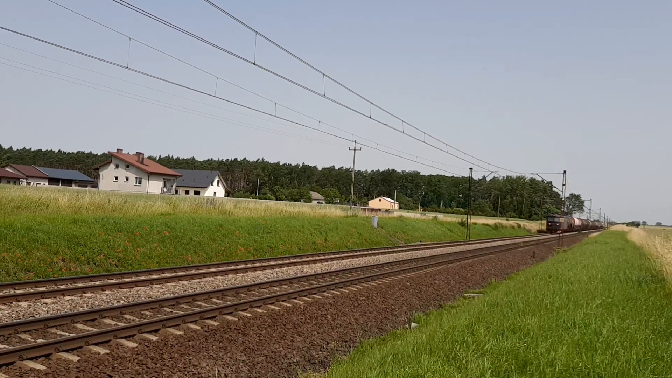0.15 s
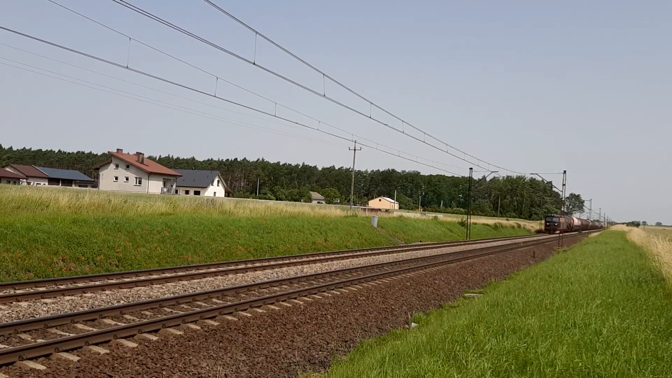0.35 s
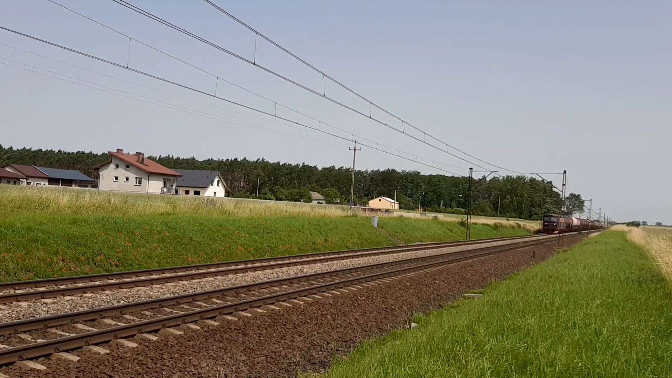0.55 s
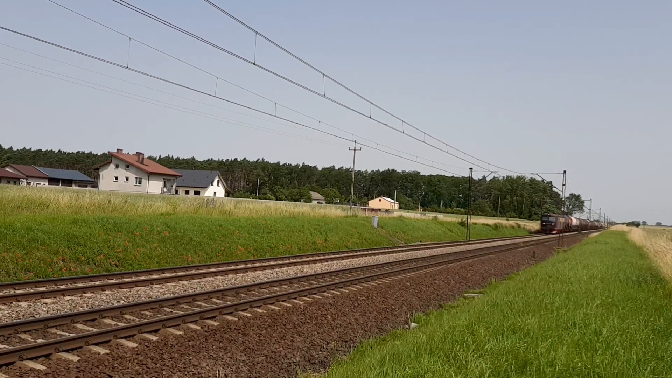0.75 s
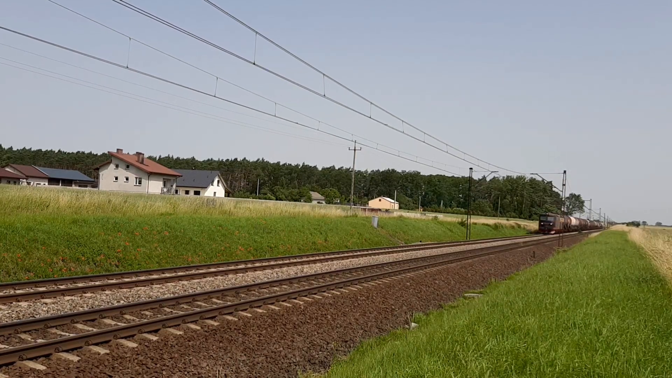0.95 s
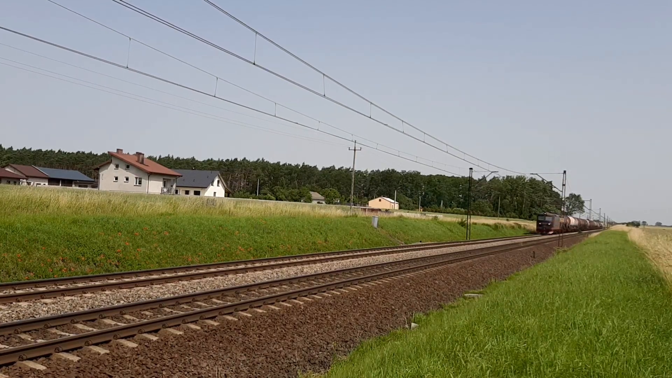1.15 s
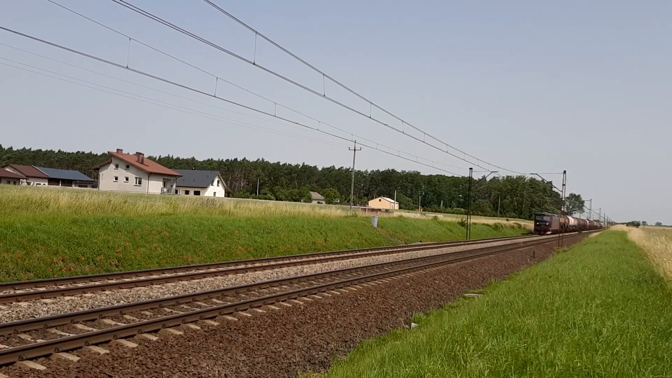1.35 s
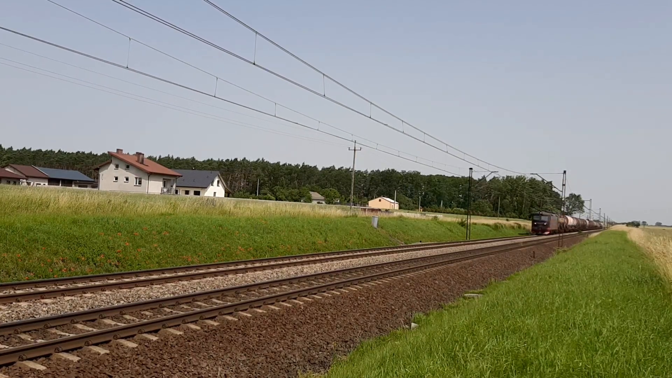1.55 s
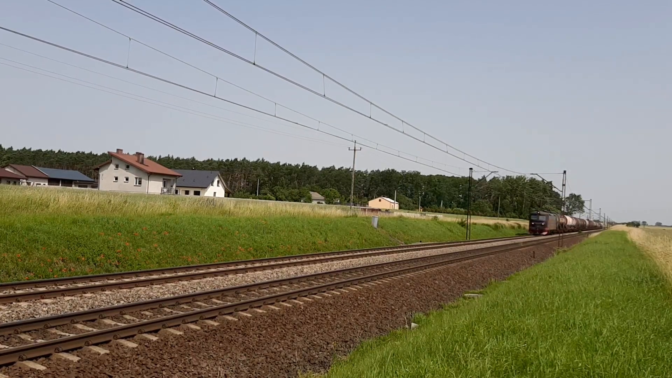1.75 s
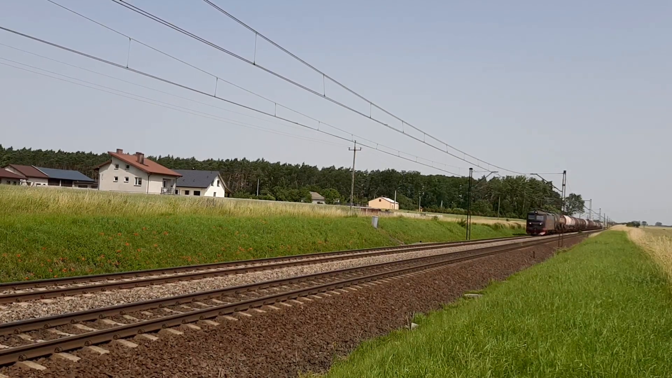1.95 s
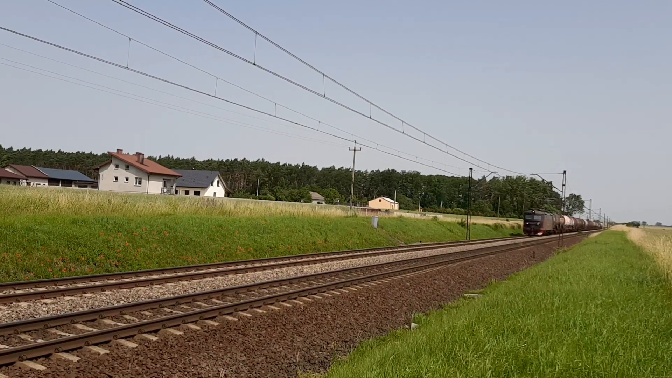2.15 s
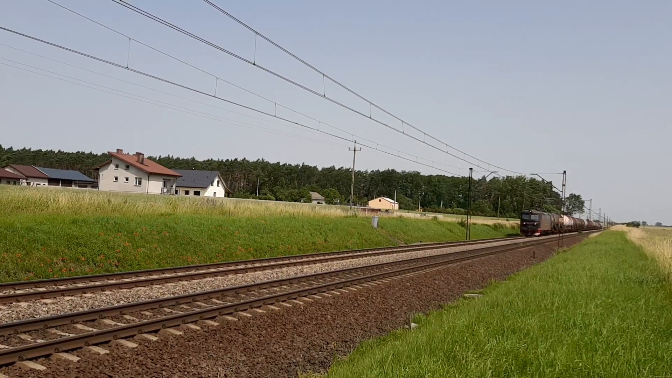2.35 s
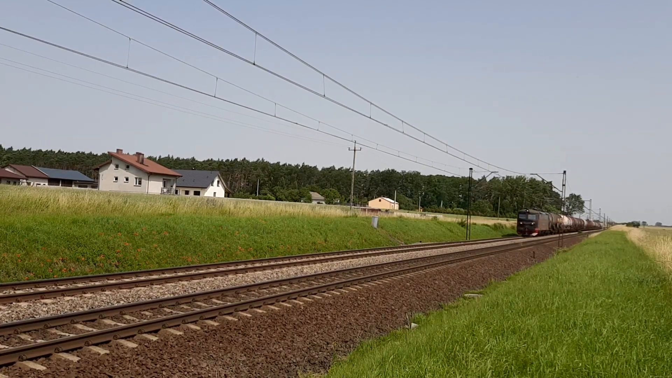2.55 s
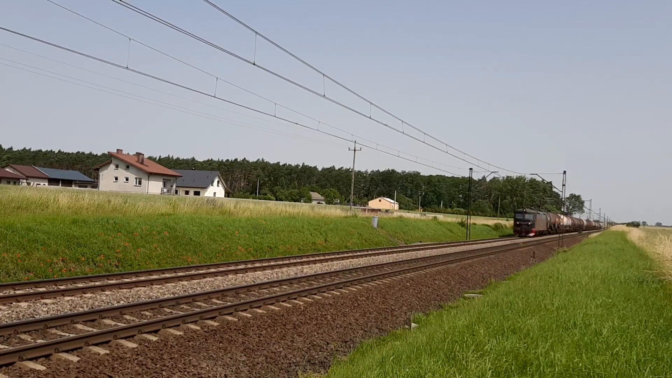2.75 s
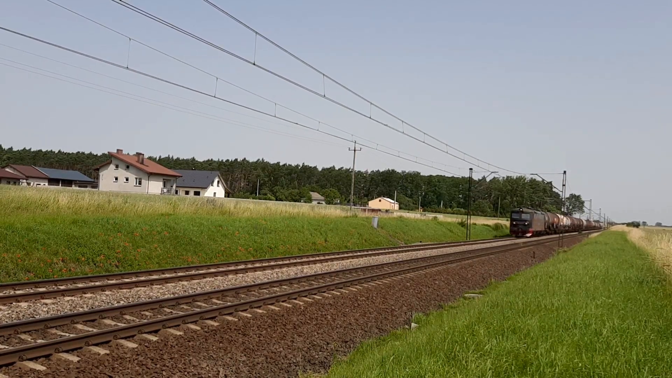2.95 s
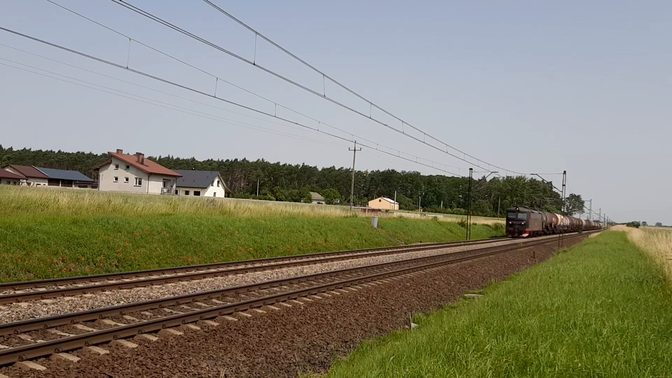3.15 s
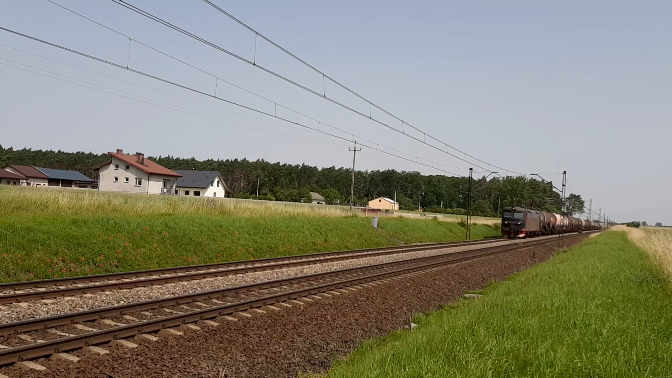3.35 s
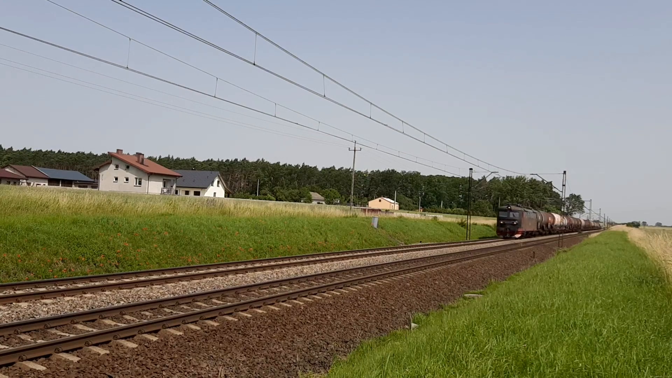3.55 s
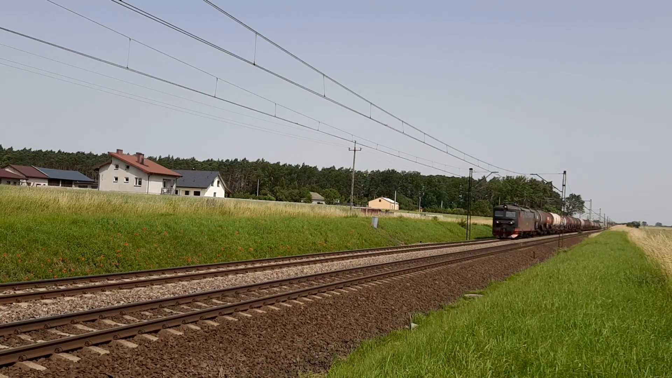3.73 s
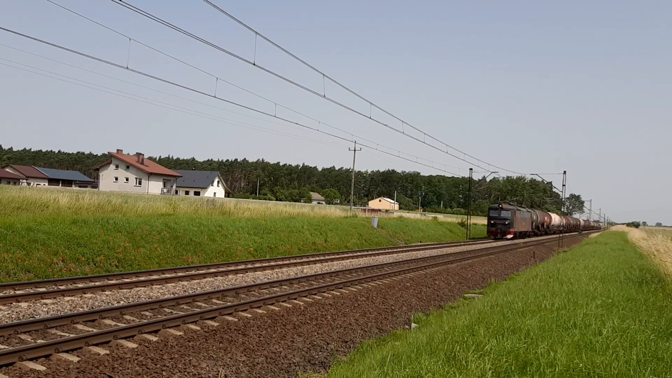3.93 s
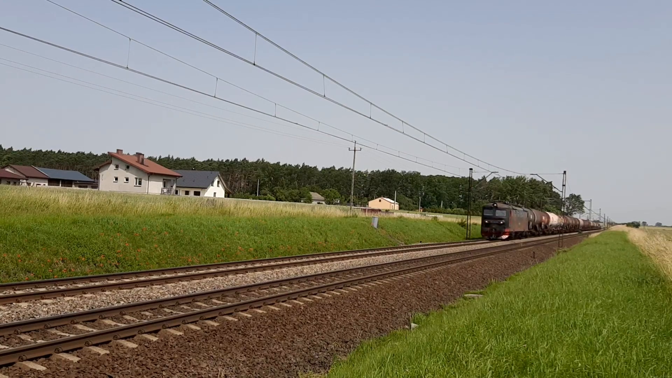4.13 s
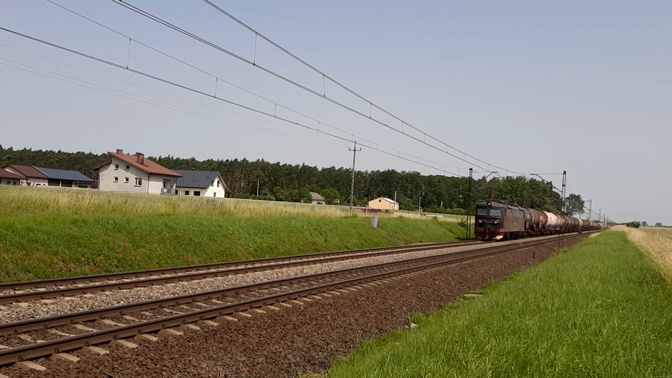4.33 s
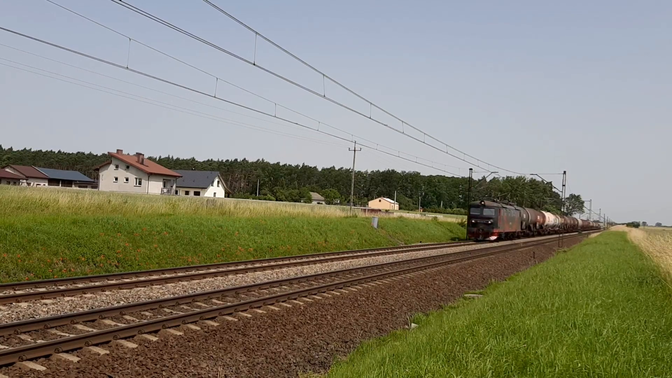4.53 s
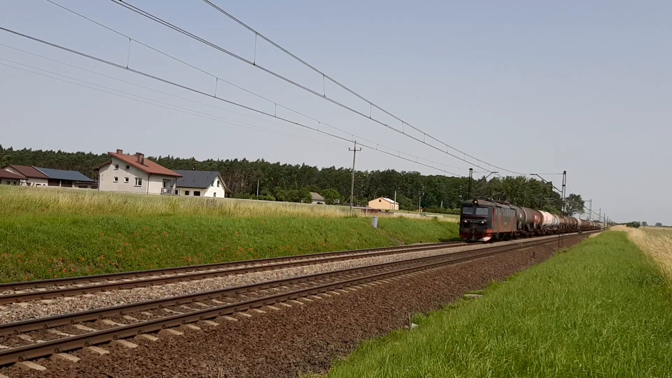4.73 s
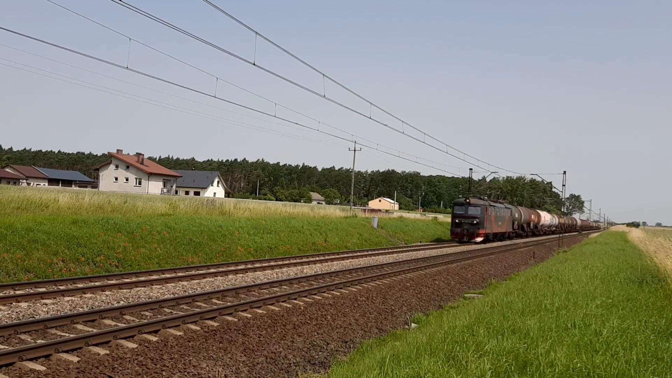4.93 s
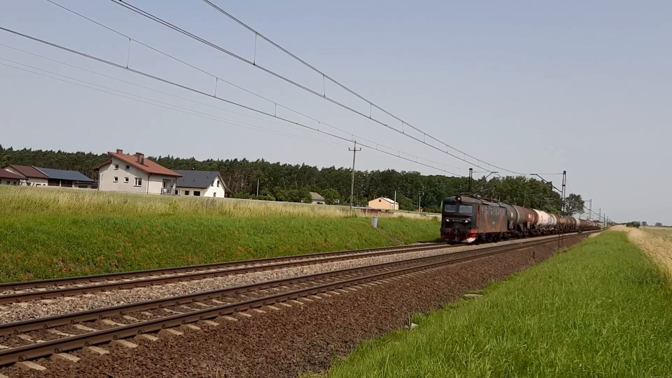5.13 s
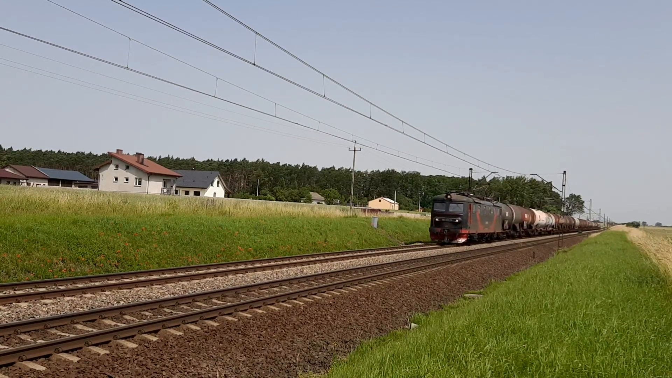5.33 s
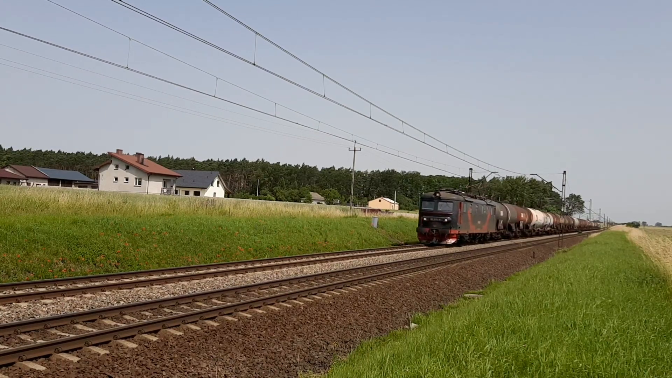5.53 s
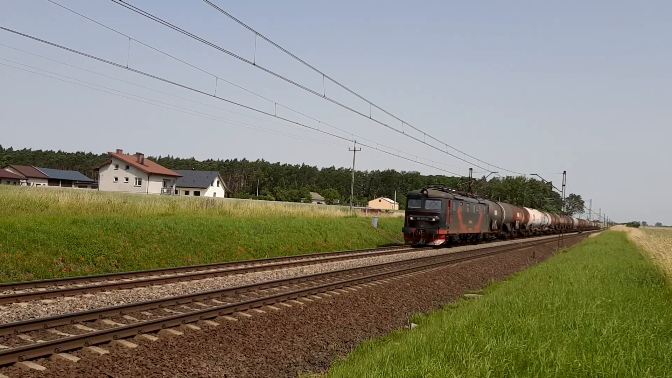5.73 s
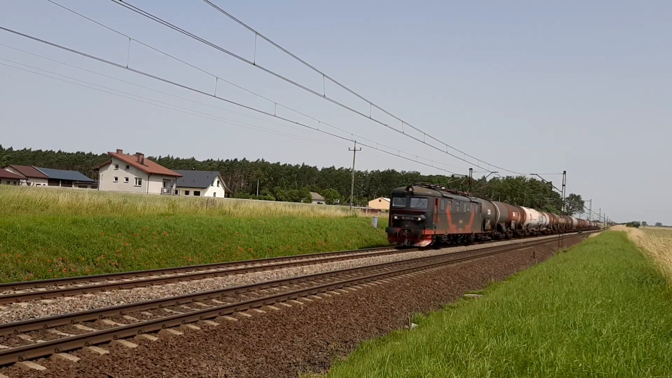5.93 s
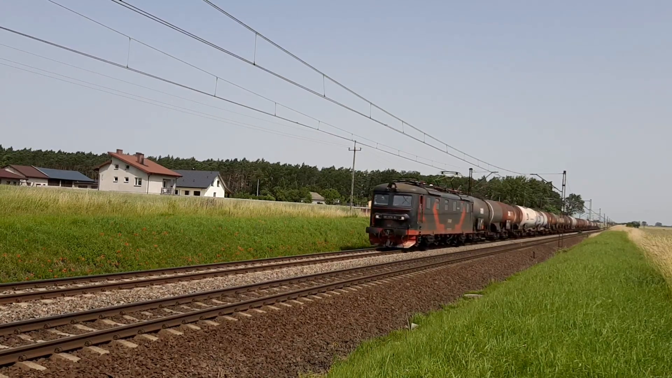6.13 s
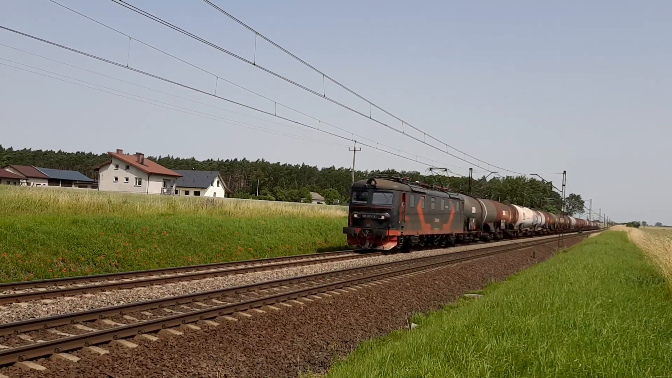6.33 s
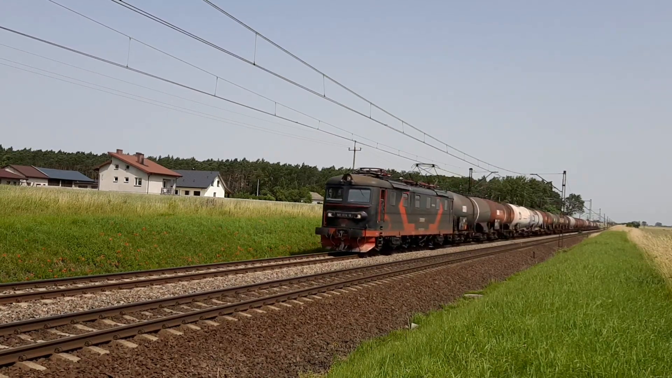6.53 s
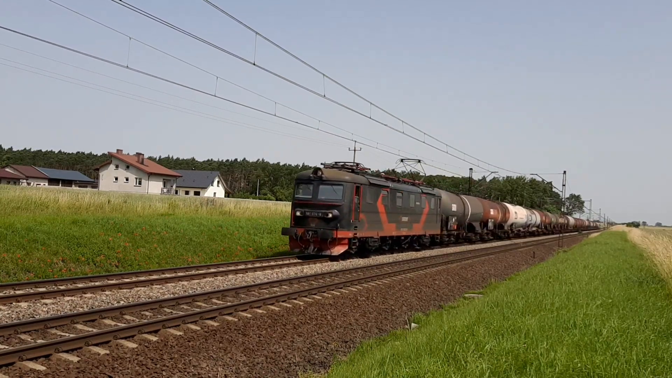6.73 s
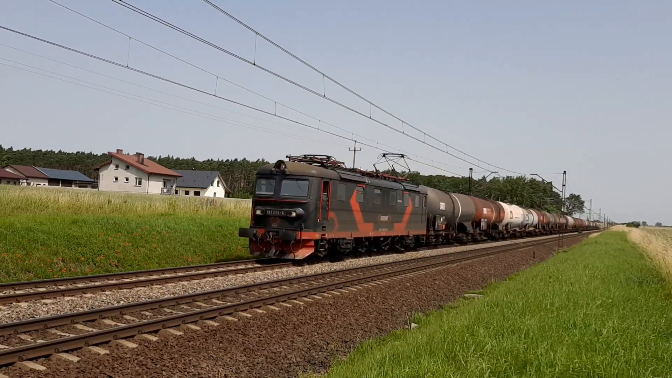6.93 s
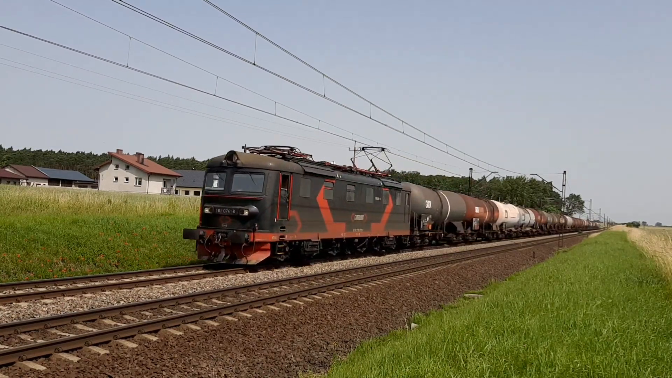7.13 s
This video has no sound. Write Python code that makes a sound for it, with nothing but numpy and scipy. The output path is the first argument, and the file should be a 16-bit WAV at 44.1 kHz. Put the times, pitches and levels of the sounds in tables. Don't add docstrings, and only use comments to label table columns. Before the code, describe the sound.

A stereo microphone stands in the open beside a railway. From 0 s, low wind buffets bump and flutter, strongest in the first half second and often heavier on the left, over a very faint hiss of grass and insects. A distant lark gives short gliding whistles from about 1.6 to 4.1 s. Around 2 s the rails start singing, a wavering metallic hum with a thin higher ring that grows ahead of the train. After 3 s a distant rolling roar emerges slightly to the right and swells. Wind gusts thump again near 4 s and hard around 5 to 5.5 s. From 4.4 s the wheel noise jumps unevenly at rough rail spots. From 5.8 s low axle thuds join, and after 6.3 s a steady mid-low gear hum stands out. The roar becomes broad, bright and heavy, moving toward the centre, loudest at the 7.3 s end.

```python
import sys
import numpy as np
from scipy import signal
from scipy.fft import rfft, irfft, next_fast_len
from scipy.io import wavfile
from scipy.ndimage import uniform_filter1d, map_coordinates

SR = 44100
rng = np.random.default_rng(int(sys.argv[2]) if len(sys.argv) > 2 else 0)


def materialize(psi):
    bounded = np.clip(np.atleast_2d(psi).T, -1, 1)
    quanta = np.round(bounded * 32767).astype(np.int16)
    wavfile.write(sys.argv[1], SR, quanta)


def voltage_ratio(level):
    return 10 ** (np.asarray(level, float) / 20)


N = 320818
TIME_S = np.arange(N) / SR

# frequency in Hz, density in dB per Hz.
GRASS_SPECTRUM = [(250, -9), (330, 5), (900, 15), (1400, 4.5), (2500, -1), (3200, -2.5), (4200, 1),
                  (5200, -2), (5700, -4.5), (6200, -7), (6900, 1.5), (7300, -11), (7800, -25.5),
                  (8500, -48)]
# frequency in Hz, density in dB per Hz.
INSECT_SPECTRUM = [(8300, -46), (8850, -16), (9100, -13), (9500, -11), (9900, -12.5), (10300, -4.5),
                   (11300, -1), (12500, 4.5), (13700, 0.5), (14600, 1.5), (15700, -0.5)]
# time in seconds, level in dB.
INSECT_LEVEL = [(0.0, -71.5), (0.63, -77.5), (1.23, -73.5), (1.56, -76.5), (1.74, -73), (2.11, -76.5),
                (2.55, -69), (2.63, -71.5), (3.62, -74), (4.15, -67), (4.39, -71.5), (4.53, -64.5),
                (4.7, -68.5), (5.87, -61), (6.38, -64.5), (6.6, -61.5), (6.82, -62.5), (7.27, -59.5)]
# frequency in Hz, left minus right in dB.
FIELD_PAN = [(300, 1), (3000, -0.5), (4500, -0.5), (5500, 3), (6800, 9), (9500, 12.5), (12500, 4),
             (14500, 4)]
# frequency in Hz, lead of the left in radians.
FIELD_LEAD = [(400, 0), (900, 1.6), (1300, 2.6), (1500, -1.9), (2600, -2.1), (3300, -3.4), (4200, -4),
              (5500, -4.6), (6800, -8.5), (9500, -8.4), (12500, -6.7), (14500, -7.7)]
# start in seconds, length in seconds, start pitch in Hz, end pitch in Hz, level in dB.
LARK_NOTES = [(1.594, .044, 4600, 3560, -54.5), (1.724, .018, 3480, 3620, -56),
              (1.9, .022, 3380, 3220, -63), (1.93, .035, 3180, 3560, -63), (2.06, .025, 3100, 3150, -65),
              (2.11, .035, 2820, 2800, -63), (2.195, .045, 2620, 2740, -60.5),
              (2.284, .042, 3540, 3580, -57), (2.315, .022, 3560, 3400, -60), (2.35, .03, 3720, 3560, -66),
              (2.375, .02, 3560, 3680, -66), (2.436, .05, 4300, 3640, -60), (2.64, .028, 3260, 3240, -63.5),
              (2.93, .045, 2940, 2800, -62), (3.02, .032, 3820, 3580, -62), (3.768, .036, 3440, 3640, -62),
              (3.8, .044, 3700, 4000, -61), (3.928, .035, 4120, 3770, -65), (3.955, .05, 3770, 3710, -62),
              (4.035, .02, 3740, 3760, -67), (4.08, .02, 3760, 3820, -63)]

# time in seconds, level on the windward port in dB, left minus right in dB.
GUSTS = [(0.0, -47, 15), (0.1, -60, 31), (0.45, -62, -6), (0.8, -57.5, 41), (1.1, -61.5, 32),
         (1.5, -71, 30), (1.7, -74, -11), (2.0, -67.5, 18), (2.5, -55.5, 6), (2.9, -70, -17), (3.3, -64, 9),
         (3.7, -58, 11), (4.0, -47.5, 1), (4.2, -57, 11), (4.45, -53.5, -24), (4.7, -54.5, 7),
         (5.1, -43, 32), (5.5, -51, -1)]
# frequency in Hz, density in dB per Hz.
BUFFET_SPECTRUM = [(15, -1), (40, -5.5), (70, -3), (110, -13.5), (160, -18.5), (250, -34.5), (400, -35),
                   (700, -42)]
# time in seconds, peak in dB, left minus right in dB, pitch in Hz.
SHED_EDDIES = [(0.006, -27.5, 2, 80.5), (0.037, -27, -3, 79), (0.145, -38, 14, 80),
               (0.263, -34.5, 13, 97), (0.289, -37, 5, 86), (0.326, -35, 27, 81), (0.484, -35, -3, 82),
               (0.639, -33.5, 18, 81), (0.704, -46, 34, 81), (0.777, -40, 49, 65), (0.82, -44, 40, 59),
               (0.963, -42.5, 36, 86), (1.062, -46, 33, 97), (1.12, -48, 32, 70), (1.154, -46, 25, 135),
               (1.202, -43, 2, 65), (1.368, -39, 30, 74), (1.552, -44.5, 38, 92), (1.661, -56, -15, 70),
               (1.709, -55, -11, 65), (1.851, -49, -2, 65), (2.148, -48, 5, 86), (2.273, -52, 4, 75),
               (2.338, -51, -10, 97), (2.453, -37, 8, 104), (2.488, -46, -8, 93), (2.532, -44, 11, 92),
               (2.588, -41, -8, 81), (2.855, -43, -2, 81), (2.9, -46, 2, 70), (3.117, -46, -2, 129),
               (3.192, -48, 5, 70), (3.221, -47, 3, 65.4), (3.427, -45, 8, 81), (3.795, -35, 20, 59),
               (3.827, -30.5, -2, 76.4), (3.876, -42, 14, 69.6), (3.917, -33, 4, 81),
               (3.949, -33, 5.5, 75.5), (4.094, -37.5, 0, 96), (4.334, -37, -3, 75),
               (4.386, -33, -41, 64.7), (4.803, -36, 7, 75), (4.844, -33.5, 0, 75), (4.985, -23, 25, 71),
               (5.181, -27.5, 26, 102), (5.369, -24, 1, 93), (5.488, -28, 1, 87)]
# time in seconds, peak in dB, left minus right in dB, pitch in Hz.
FURTHER_EDDIES = [
    (2.762, -47, -3, 65),
    (3.545, -45, 2, 75),
    (4.2, -46, 3, 130),
    (4.6, -43, -1, 72),
    (5.09, -37, 20, 75),
    (5.285, -32, 10, 65),
    (5.6, -38, -1, 88),
]

# time in seconds, peak in dB, left minus right in dB, pitch in Hz.
AXLE_JOLTS = [(5.795, -32.5, -1, 87.4), (5.877, -35, 2, 75), (5.931, -34, -3, 97), (5.967, -37, -1, 81),
              (6.059, -36, 0, 140), (6.088, -33, 1, 118), (6.195, -32, 3, 97), (6.313, -32, 0, 101),
              (6.393, -33, 1, 102), (6.439, -29.5, 5, 108), (6.546, -31, 1, 108), (6.935, -29, -2, 128),
              (6.972, -28, 4, 108), (7.07, -26, 1, 101), (7.122, -30, 0, 97), (7.182, -29, 0, 92)]
# time in seconds, jump of the rolling noise in dB.
ROUGH_SPOTS = [(4.372, -7), (4.491, 4), (4.663, 5.5), (4.783, 2), (4.956, 3), (5.132, 3), (5.177, 6),
               (5.345, 4), (5.456, 6), (5.5, 4), (5.63, 1), (5.758, 3.5), (5.858, 6), (5.983, 4),
               (6.047, 6.5), (6.19, 2.5), (6.234, 2), (6.269, 2.5), (6.389, 3), (6.589, 2.5), (6.653, 5),
               (6.752, 3), (7.046, 2.5), (7.205, 2)]

# time in seconds, level in dB.
SONG_LEVEL = [(0.0, -67), (0.5, -64), (1.2, -67), (2.0, -54), (2.4, -52), (3.2, -52.5), (4.0, -45),
              (4.6, -40.5), (5.0, -37), (5.4, -37), (5.9, -34.5), (6.4, -33), (7.27, -28)]
# frequency in Hz, density in dB per Hz.
SONG_SPECTRUM = [(470, -51), (540, -11.5), (610, 2.5), (660, 6.5), (720, 6.5), (800, 5.5), (900, 2),
                 (990, -3), (1080, -10), (1160, -5), (1400, -5.5), (1450, -47)]
# time in seconds, level in dB.
RING_LEVEL = [(0, -47), (0.5, -66), (1.4, -57.5), (2.0, -51), (3.4, -48.5), (4.0, -45.5), (4.4, -46),
              (4.8, -41.5), (5.3, -47.5), (6.4, -71)]
# frequency in Hz, density in dB per Hz.
RING_SPECTRUM = [(1130, -38), (1185, -1), (1235, 0.5), (1290, 3), (1345, -10.5), (1385, -27), (1420, -35)]
# time in seconds, low mode in Hz, ring in Hz.
RAIL_MODES = [(0, 663, 1246), (2.1, 663, 1233), (3.2, 661, 1219), (4.9, 662, 1216), (5.8, 659, 1226),
              (6.5, 657, 1241), (7.27, 656, 1251)]
# frequency in Hz, lead of the left in radians.
RAIL_LEAD = [(480, -2), (560, 0), (700, 1.82), (900, 1.7), (1220, 2), (1400, 3)]

# time in seconds, nearness in dB.
APPROACH = [(0, -43), (2.0, -42), (3.0, -32.5), (3.6, -30.5), (4.2, -23), (4.8, -19.5), (5.4, -17),
            (6.0, -10.5), (6.25, -9), (6.5, -7.5), (6.7, -5.5), (6.9, -2.5), (7.1, -1.5), (7.27, -1)]
# frequency in Hz, density in dB per Hz.
BASS_SPECTRUM = [(25, -36), (50, -4.5), (80, -3.5), (130, -5), (200, -4), (250, -7)]
# frequency in Hz, density in dB per Hz.
RUMBLE_SPECTRUM = [(200, -33), (240, -6.5), (270, -7.5), (300, 0), (350, -4.5), (420, -2), (490, -6),
                   (520, -8.5), (580, -26)]
# frequency in Hz, density in dB per Hz.
ROAR_SPECTRUM = [(480, -47), (560, 4), (620, 11), (850, -11.5), (1100, -50), (1270, 1), (1410, -8.5),
                 (1530, 2), (1700, -2), (2020, -1), (2200, 0.5), (2450, -0.5), (2750, -5), (3100, -11)]
# frequency in Hz, density in dB per Hz.
RUSH_SPECTRUM = [(2350, -32), (2700, -2), (3800, -3), (4700, -4.5), (5800, -6), (6600, -15), (7500, -19.5),
                 (8500, -36), (10000, -28.5)]
# frequency in Hz, width in Hz, level in dB.
FRAME_MODES = [(430, 45, -6), (496, 14, -3)]
# frequency in Hz, width in Hz, level in dB.
WHEEL_MODES = [(1514, 50, -2), (1787, 22, -1), (2022, 40, 2), (2299, 16, -1), (2408, 40, 2), (2513, 20, 0),
               (2610, 18, -1), (3790, 16, 6)]
# time in seconds, pitch in Hz, level in dB.
GEAR = [(6.2, 417.5, -48), (6.36, 418, -35), (6.47, 417.5, -39), (6.6, 417, -33), (6.73, 417, -31),
        (6.77, 416.7, -27), (6.95, 417, -29), (7.12, 417, -29), (7.27, 415, -30)]
# multiple of the pitch, level in dB.
GEAR_ORDERS = [(1, 1.5), (2, -16.5), (3, -17)]
# time in seconds, pitch in Hz, level in dB.
BLOWER = [(2.8, 436.5, -72), (4.1, 436.6, -57), (5.1, 436.6, -47), (5.7, 436.6, -43), (6.2, 436.1, -49),
          (6.5, 436, -46), (6.9, 435, -33.5), (7.27, 434.2, -38)]
# time in seconds, pitch in Hz, level in dB.
MOTOR = [(6.3, 388, -46), (6.8, 387, -36), (7.0, 387, -36), (7.27, 387, -32)]
# time in seconds, pitch in Hz, level in dB.
BOGIE = [(5.4, 293, -56), (5.87, 292, -41), (6.05, 294, -48), (6.3, 300, -54), (6.68, 308, -41),
         (6.9, 315, -50), (7.15, 325, -41), (7.21, 325, -32), (7.27, 326, -32)]


def unit(x):
    return x / np.sqrt(np.mean(x ** 2) + 1e-20)


def along(points, hz):
    f, v = np.transpose(points)
    return np.interp(np.log(hz + 1), np.log(f + 1), v)


def curves(rows):
    s, *columns = np.transpose(rows)
    return [np.interp(TIME_S, s, column) for column in columns]


def wobble(rate):
    coarse = np.arange(0, N + 64, 64)
    knots = rng.standard_normal(int(N * rate / SR) + 4)
    smooth = map_coordinates(knots, [coarse * rate / SR])
    return np.interp(np.arange(N), coarse, smooth)


def filtered(x, response):
    m = next_fast_len(N + 8192)
    return irfft(rfft(x, m) * response(np.fft.rfftfreq(m, 1 / SR)), m)[..., :N]


def resonant(x, peaks):
    def response(f):
        return 1 + sum(voltage_ratio(db) * 1j * f * width / (centre ** 2 - f ** 2 + 1j * f * width)
                       for centre, width, db in peaks)
    return filtered(x, response)


def turned(pair, lead):
    return filtered(pair, lambda hz: np.exp(.5j * np.outer([1, -1], lead(hz))))


def lagged(pair, samples):
    at = np.arange(N)
    left = map_coordinates(pair[0], [at - samples / 2])
    right = map_coordinates(pair[1], [at + samples / 2])
    return np.array([left, right])


def ports(db, pan_db):
    return np.array([db + np.minimum(pan_db, 0), db - np.maximum(pan_db, 0)])


def patchy_noise(spectrum, alike, patchy_db):
    z = rng.standard_normal((2, 257, 2 * (N // 256 + 2))).view(complex)
    patches = uniform_filter1d(rng.standard_normal(z.shape[1:]), size=4, axis=0)
    patches = uniform_filter1d(patches, size=14, axis=1)
    z = voltage_ratio(patchy_db * unit(patches)) * z
    pair = signal.istft(z, window="cosine", nperseg=512)[1][:, :N]

    def shape(hz):
        inside = (hz > spectrum[0][0]) * (hz < 1.05 * spectrum[-1][0])
        return voltage_ratio(along(spectrum, hz)) * inside

    turn = np.arccos(np.clip(alike, -1, 1)) / 2
    mid, side = filtered(pair, shape) * [[np.cos(turn)], [np.sin(turn)]]
    return unit(np.array([mid + side, mid - side]))


def tone(hz, db, orders, drift_hz, flutter_db, rate):
    phase = 2 * np.pi * np.cumsum(hz + drift_hz * wobble(rate)) / SR
    return np.sqrt(2) * sum(voltage_ratio(db + level + flutter_db * wobble(rate)) * np.sin(k * phase)
                            for k, level in orders)


def push(hz, phase):
    t = np.arange(4000) / SR
    rise = t * hz / .5
    return np.sin(2 * np.pi * hz * t + phase) * (rise * np.exp(1 - rise)) ** 1.15


def field():
    rustle_db = np.minimum(-69 + 2 * TIME_S, -59.5)
    grass = voltage_ratio(rustle_db + 9.5) * patchy_noise(GRASS_SPECTRUM, alike=0.19, patchy_db=1.0)
    insect_db = curves(INSECT_LEVEL)[0] + 2.5 + .5 * wobble(25)
    insects = voltage_ratio(insect_db) * patchy_noise(INSECT_SPECTRUM, alike=0.18, patchy_db=2.2)
    hiss = filtered(grass + insects, lambda hz: voltage_ratio(np.outer([.5, -.5], along(FIELD_PAN, hz))))
    return turned(hiss, lambda hz: along(FIELD_LEAD, hz))


def lark():
    out = np.zeros(N)
    for s, length, start_hz, end_hz, db in LARK_NOTES:
        u = np.linspace(0, 1, round(length * SR))
        hz = end_hz + (start_hz - end_hz) * (1 - u) ** 1.9
        swell = np.sin(np.pi * u ** .75) ** .5
        whistle = np.sin(2 * np.pi * np.cumsum(hz) / SR)
        out[round(s * SR):][:len(u)] += voltage_ratio(db + 2) * swell * whistle
    lag_samples = 9.2
    return turned(out * voltage_ratio([[-3], [1.5]]), lambda hz: -2 * np.pi * hz * lag_samples / SR)


def small_eddies(gust_db, pan_db):
    eddies_per_s, over_gust_db, scatter_db = 2, 2, 3
    when, size = rng.random((60, 2))[:int(eddies_per_s * 6.5)].T
    at = (when * (N - 5000) + 600).astype(int)
    db = gust_db[at] + over_gust_db + scatter_db * (2 * size - 1)
    return zip(at / SR, db, pan_db[at], 110 - 45 * size)


def wind():
    covered_db = -20 * np.clip((TIME_S - 5.6) / 0.97, 0, 1)
    gust_db, pan_db = curves(GUSTS)
    lumps_db = 2.5 * np.array([wobble(30), wobble(30)])
    lulls_db = 3 * np.array([wobble(12), wobble(12)])
    churn = patchy_noise(BUFFET_SPECTRUM, alike=0.016, patchy_db=-0.7)
    out = voltage_ratio(ports(gust_db, pan_db) + 9.0 + covered_db) * unit(voltage_ratio(lumps_db + lulls_db) * churn)

    eddies = [*SHED_EDDIES, *small_eddies(gust_db + covered_db, pan_db), *FURTHER_EDDIES]
    wake_db, wake_s, snap_db, snap_times = -12.5, 0.0097, -14.5, 2.76
    t = np.arange(4000) / SR
    wake_swell = voltage_ratio(wake_db) * t / wake_s * np.exp(1 - t / wake_s)
    for (s, db, side_db, hz), (phase, spread) in zip(eddies, rng.random((100, 2))):
        apart = 1.2 + 1.2 * (spread - .5)
        cycle = push(hz, 2 * np.pi * phase + np.array([[0], [apart]]))
        start = max(round((s - .006) * SR), 0)
        span = slice(start, start + len(t))
        wake = wake_swell * churn[:, span]
        snap = voltage_ratio(snap_db) * push(snap_times * hz, 2 * np.pi * spread)
        out[:, span] += voltage_ratio(ports(db, side_db)[:, None] + 0.3) * (cycle + wake + snap)
    return filtered(out, lambda f: (1j * f / (45 + 1j * f)) ** 2)


def jolts():
    out = np.zeros((2, N + SR))
    for (s, db, side_db, hz), phase in zip(AXLE_JOLTS, rng.random(30)):
        thud = push(hz, 2 * np.pi * phase)
        start = round((s - .006) * SR)
        out[:, start:start + len(thud)] += voltage_ratio(ports(db + 0.5, side_db)[:, None]) * thud
    return out[:, :N]


def knocked(x):
    decay_s, unload_s, unload_share, top_hz = .014, .008, .6, 1400
    db = np.zeros(N)
    for s, jump_db in ROUGH_SPOTS:
        apart_s = abs(TIME_S - s)
        before = -unload_share * np.exp(-apart_s / unload_s)
        db = db + jump_db * np.where(TIME_S >= s, np.exp(-apart_s / decay_s), before)
    change = x * (voltage_ratio(uniform_filter1d(db, size=60)) - 1)
    return x + filtered(change, lambda f: 1 / (1 + (f / top_hz) ** 6))


def bearing():
    abreast_s, side_s, widest_lag = 7.343, 1.77, 7.1
    along_track = (abreast_s - TIME_S) / side_s
    return widest_lag * along_track / np.sqrt(1 + along_track ** 2)


def rails():
    (song_db,), (ring_db,) = curves(SONG_LEVEL), curves(RING_LEVEL)
    low_hz, ring_hz = curves(RAIL_MODES)
    low_db = song_db - 6.5 - 20 * np.clip(1 - (TIME_S - 1.2) / 0.43, 0, 1)
    band_db = -24.5 + 0.64 * song_db
    shake_db = 1.1 * wobble(13)
    ahead = np.clip((3.2 - bearing()) / 3, 0, 1)

    song = voltage_ratio(song_db - 2.5) * patchy_noise(SONG_SPECTRUM, alike=0.77, patchy_db=1.5)
    band = voltage_ratio(band_db + 4.0) * patchy_noise(RING_SPECTRUM, alike=0.95, patchy_db=2.0)
    low_mode = tone(low_hz, low_db, [(1, -4.2)], drift_hz=7, flutter_db=2.5, rate=22)
    ring = tone(ring_hz, ring_db, [(1, -4)], drift_hz=13, flutter_db=2.4, rate=45)
    damping = voltage_ratio(-13 * ahead)
    steel = (song + band + (low_mode + ring) * damping) * voltage_ratio(shake_db)

    far_db = -59 - 20 * np.clip(TIME_S - 2.2, 0, 3)
    far = tone(1335, far_db, [(1, -3)], drift_hz=30, flutter_db=3, rate=50)
    from_side = (1 - ahead) * turned(steel, lambda hz: along(RAIL_LEAD, hz))
    return from_side + ahead * steel + turned(far, lambda hz: 2.07 + 0 * hz)


def nearing(closest_db, grows, far_db, full_db=0):
    near_db, = curves(APPROACH)
    engine = voltage_ratio(closest_db + grows * np.minimum(near_db, full_db))
    murmur = voltage_ratio(far_db + 0.035 * (near_db - near_db[0]))
    return np.hypot(engine, murmur)


def rolling():
    roar_gain = voltage_ratio(2.06) * nearing(-30, 1.35, -75, full_db=-1.5)
    roar = roar_gain * patchy_noise(ROAR_SPECTRUM, alike=0.95, patchy_db=0.5)
    rush_gain = nearing(-30.5, 1.494, -69.5, full_db=-4.5)
    rush = rush_gain * patchy_noise(RUSH_SPECTRUM, alike=0.8, patchy_db=0.6)
    rumble = resonant(patchy_noise(RUMBLE_SPECTRUM, alike=0.92, patchy_db=0.5), FRAME_MODES)
    rumble = voltage_ratio(-3.0) * nearing(-25.5, 0.99, -67) * rumble
    bass_gain = nearing(-35, 1.04, -106) * voltage_ratio(1.7 * wobble(22))
    bass = bass_gain * patchy_noise(BASS_SPECTRUM, alike=0.93, patchy_db=1.0)
    return resonant(roar + rush, WHEEL_MODES) + rumble + bass


def machine(rows, orders, drift_hz, flutter_db):
    fade = np.clip((TIME_S - rows[0][0]) / 0.061, 0, 1)
    return fade * tone(*curves(rows), orders, drift_hz, flutter_db, rate=13)


def hum():
    gear = machine(GEAR, GEAR_ORDERS, drift_hz=.9, flutter_db=.8)
    blower = machine(BLOWER, [(1, .6)], drift_hz=1.2, flutter_db=2.4)
    motor = machine(MOTOR, [(1, 0)], drift_hz=1.5, flutter_db=2)
    bogie = machine(BOGIE, [(1, -1)], drift_hz=2, flutter_db=1.5)
    return gear + blower + motor + bogie


def locomotive():
    shake_db = .4 * wobble(11)
    return lagged(knocked(rolling()) * voltage_ratio(shake_db) + hum(), bearing())


def scene():
    return field() + lark() + wind() + jolts() + knocked(rails()) + locomotive()


def low_pass(x):
    return signal.sosfilt(signal.butter(12, 15730, fs=SR, output="sos"), x)


def record(dry):
    return low_pass(dry)


dry = scene()
out = record(dry)
materialize(out)
```